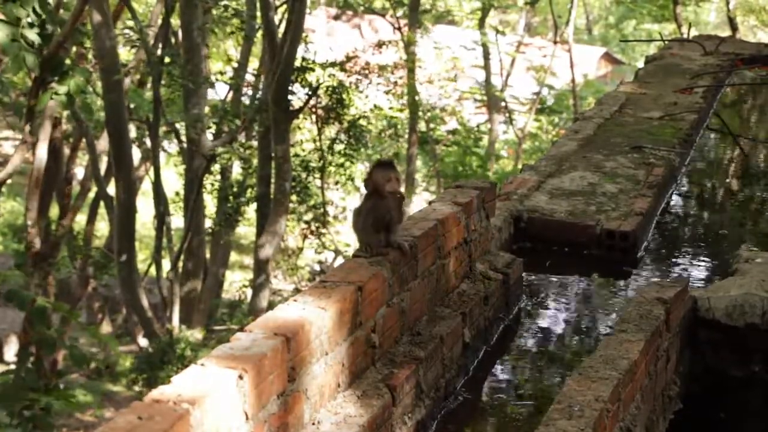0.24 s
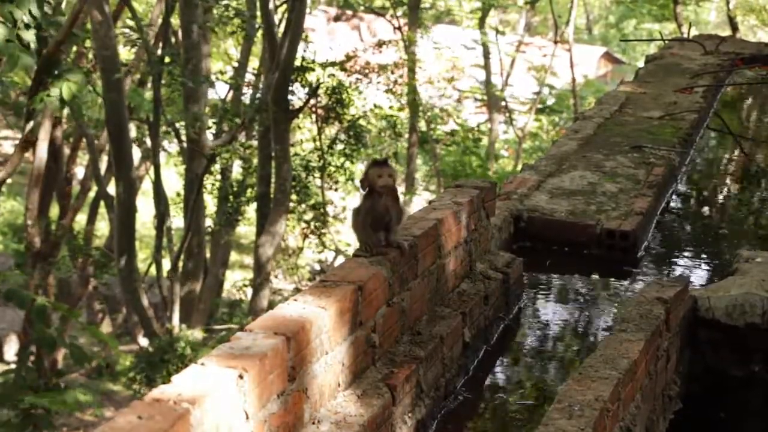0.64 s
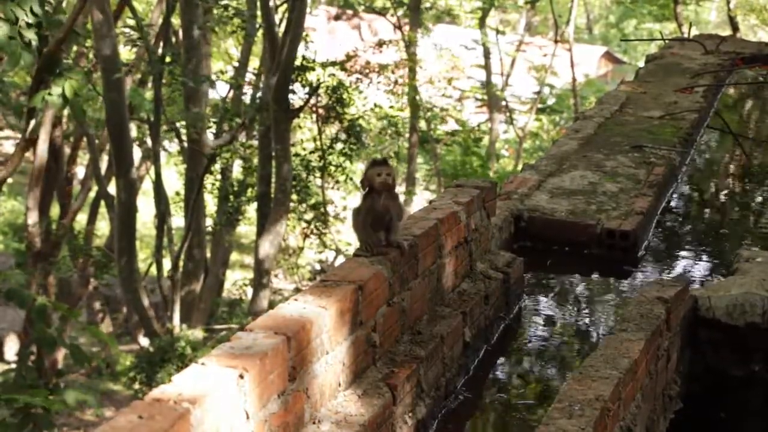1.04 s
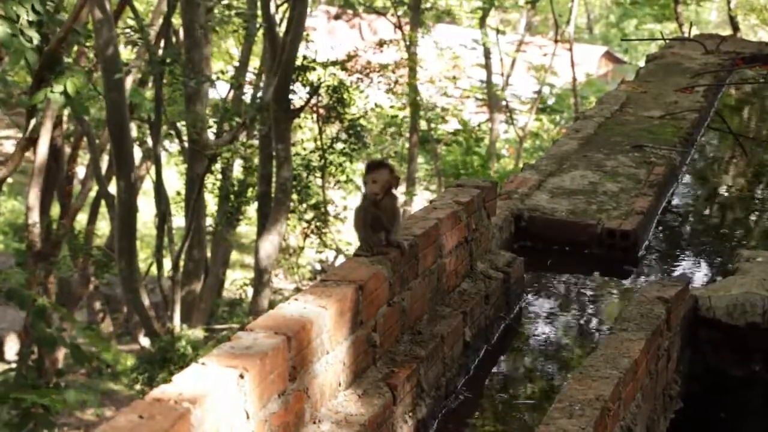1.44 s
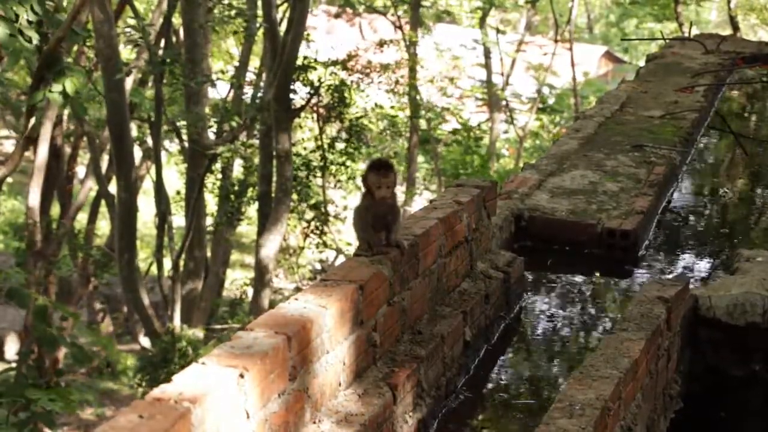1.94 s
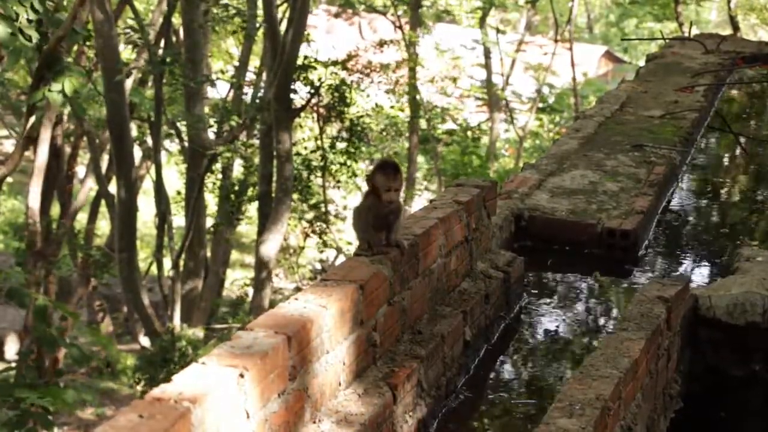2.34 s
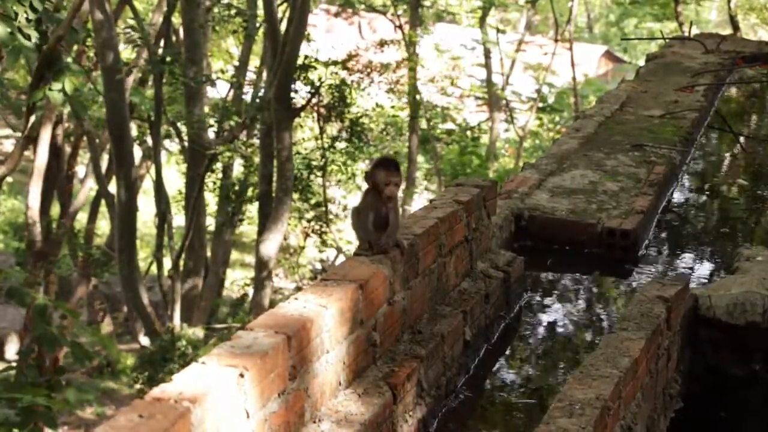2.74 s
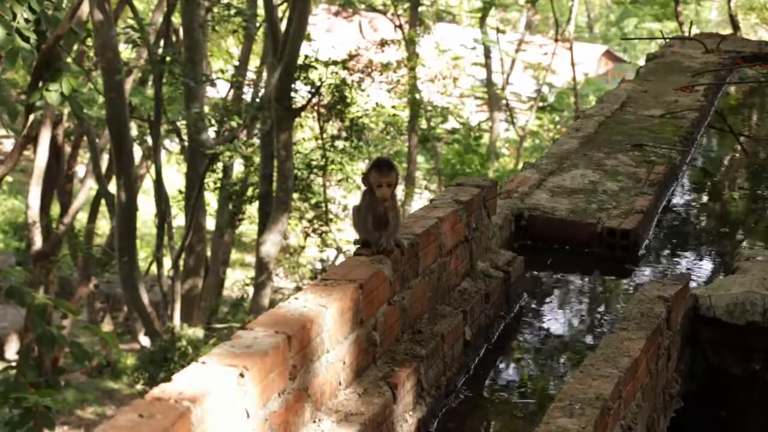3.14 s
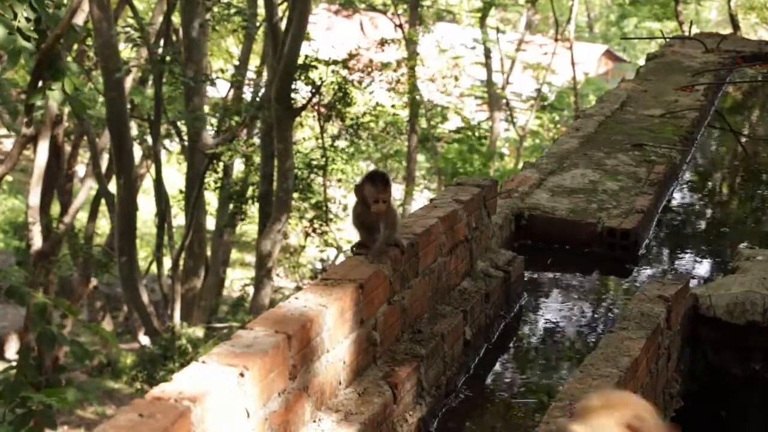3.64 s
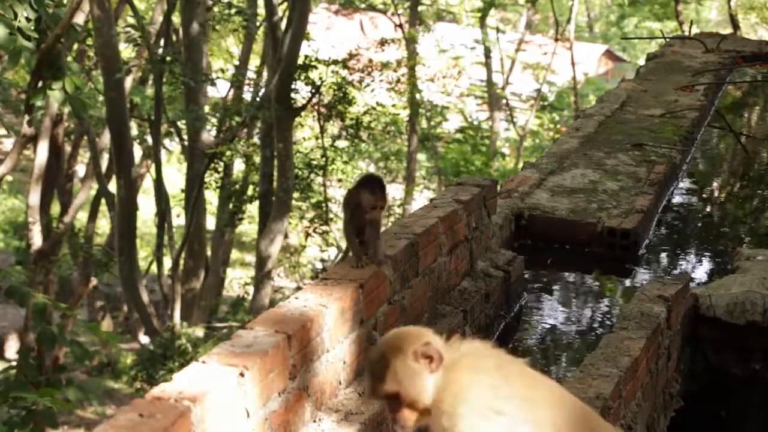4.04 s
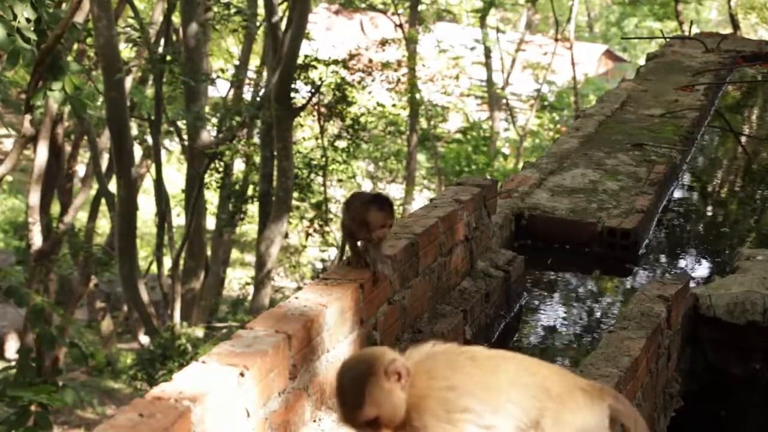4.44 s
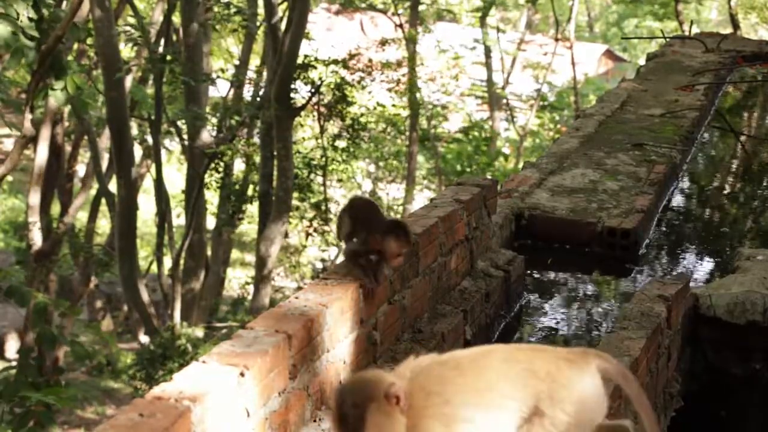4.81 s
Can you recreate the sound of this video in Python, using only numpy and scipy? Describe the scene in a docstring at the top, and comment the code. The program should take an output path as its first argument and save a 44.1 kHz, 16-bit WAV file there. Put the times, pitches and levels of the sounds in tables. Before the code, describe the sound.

Birds call over a soft forest hush while monkeys tap across brick, crackle dry leaves and tip over something hollow.

```python
"""Quiet woodland beside a brick water channel, with macaques moving about close to the microphone.
Over a soft hush of air and far insects, a bird whistles well back on the left, while the monkeys' feet
tap on brick and snap twigs on the right. A second bird joins with short runs of falling chips, and the
monkeys brush and crackle through dry litter. Near four seconds, between low bumps at the microphone,
something hard and hollow tips over and rattles to rest. A last run of chips and sharp snaps follow."""
import sys
import numpy as np
from scipy import signal
from scipy.fft import rfft, irfft
from scipy.io import wavfile
from scipy.ndimage import uniform_filter1d

SR = 44100
rng = np.random.default_rng(int(sys.argv[2]) if len(sys.argv) > 2 else 0)


def generate_wav(signal):
    """Clip the signal to [-1, 1] and save it as 16-bit WAV at the path in sys.argv[1]."""
    frames = np.transpose(np.atleast_2d(signal))
    scaled = np.clip(frames, -1, 1) * 32767
    pcm = np.round(scaled).astype(np.int16)
    wavfile.write(sys.argv[1], SR, pcm)


N = 223719
LAG = 7  # samples by which a sound on the right reaches the left microphone later


def amp(db):
    """Decibels to gain."""
    return 10 ** (np.asarray(db) / 20)


def unit(x):
    """Scales to rms 1."""
    return x / np.sqrt(np.mean(x ** 2) + 1e-20)


def read(points, hz):
    """Reads a table on a log-frequency axis."""
    f, value = np.transpose(points)
    return np.interp(np.log(hz + 1), np.log(f + 1), value)


def colour(x, points):
    """Filters a sound by a table of (frequency [Hz], gain [dB])."""
    n = x.shape[-1]
    return irfft(rfft(x) * amp(read(points, np.fft.rfftfreq(n, 1 / SR))), n)


def band(x, centre_hz, spread):
    """Keeps a bell of frequencies, spread in octaves, tilted slightly to the bass; rms 1."""
    n = x.shape[-1]
    hz = np.fft.rfftfreq(n, 1 / SR) + 1
    bell = np.exp(-.5 * (np.log2(hz / centre_hz) / spread) ** 2)
    return unit(irfft(rfft(x) * bell / hz ** (1 / 4), n))


def fade(t, t60):
    """Exponential decay, 60 dB down at t60."""
    return np.exp(-np.log(1000) * t / np.maximum(t60, 1e-3))


def add(mix, s, sound):
    """Mixes a sound in at s seconds."""
    part = mix[..., round(s * SR):][..., :sound.shape[-1]]
    part += sound[..., :part.shape[-1]]


def hush(level_db=-43.5, patchy_db=1.5, swell_db=0.2, lean_db=0.5):
    """Distant air and foliage all around: noise whose level drifts in patches of time and frequency."""
    # spectrum of the air: (frequency [Hz], relative level [dB])
    spectrum = [(15, -52), (25, -12.5), (97, -0.5), (170, -2.5), (263, -3), (439, -9.5), (560, -8.5),
                (1000, -12), (1370, -14), (2280, -14), (2910, -15), (4030, -17.5), (5570, -20),
                (14800, -32.5), (16000, -39)]
    # slow drift in the level of the upper hush, in full from 1 kHz up: (time [s], gain [dB])
    upper_drift = [(0, 2), (.7, 1.5), (1.3, 2), (2.1, 1.5), (2.55, 1), (3.6, 1), (4.3, -0.5), (5.05, 1)]
    # how alike the air is at the two microphones: (frequency [Hz], coherence [-1 to 1])
    likeness = [(60, 0.59), (120, 0.98), (240, 0.88), (480, 0.74), (950, 0.28), (1900, -0.2), (3800, -0.12),
                (7500, 0.064)]
    frames, hz = N // 256 + 5, np.fft.rfftfreq(1024, 1 / SR)
    left_re, left_im, other_re, other_im, patches = rng.standard_normal((frames, 513, 5)).T
    patches = unit(uniform_filter1d(uniform_filter1d(patches, size=12, axis=0), size=14, axis=1))
    swell = unit(uniform_filter1d(rng.standard_normal(frames), size=30))
    upper_share = np.minimum(hz / 1000, 1)[:, None]
    drift_db = upper_share * np.interp(np.arange(frames) * 256 / SR, *np.transpose(upper_drift))
    same = np.clip(read(likeness, hz), -1, 1)[:, None]
    left = left_re + 1j * left_im
    right = same * left + np.sqrt(1 - same ** 2) * (other_re + 1j * other_im)
    lean = read([(500, lean_db), (2000, -lean_db)], hz)[:, None]  # bass to the left, treble to the right
    db = read(spectrum, hz)[:, None] + drift_db + patchy_db * patches + swell_db * swell
    spectra = np.array([left * amp(db + lean), right * amp(db - lean)])
    air = signal.istft(spectra, nperseg=1024, noverlap=768)[1][:, :N]
    return amp(level_db) * unit(air)


def hum(level_db=-57, pitch_hz=100):
    """A faint far-off hum: a band of noise so narrow that it wavers."""
    return amp(level_db) * band(rng.standard_normal(N), pitch_hz, spread=0.018)


def insects(level_db=-60, pitch_hz=5550):
    """A far chorus of insects, merged into a thin steady hiss."""
    return amp(level_db) * band(rng.standard_normal((2, N)), pitch_hz, spread=0.16)


def tick(db, centre_hz, t60, ring_db=-2, rise_s=0.00018):
    """A snap or tap: a wide crack plus the narrow ring of the thing struck, both dying quickly."""
    t = np.arange(4096) / SR
    crack = band(rng.standard_normal((2, len(t))), centre_hz, spread=0.77)
    ring = band(rng.standard_normal((2, len(t))), centre_hz, spread=0.19)
    envelope = (1 - np.exp(-t / rise_s)) * fade(t, t60)
    return amp(db) * unit(crack + amp(ring_db) * ring) * envelope


def crumbs(length, pitch_hz, per_s=700, t60=0.029, scatter_octaves=0.541, scatter_db=3):
    """Crumbs of brick roll under a foot, each with a short ring of its own pitch."""
    t = np.arange(2048) / SR
    out = np.zeros((2, round(length * SR) + len(t)))
    for s in np.arange(0, length, 1 / per_s):
        size, strength, late, side = rng.standard_normal(4)
        phase = 2 * np.pi * pitch_hz * 2 ** (size * scatter_octaves) * t
        ring = np.sin([phase + side, phase]) * fade(t, t60)
        add(out, s + abs(late) / per_s, amp(strength * scatter_db) * ring)
    return out * np.sqrt(length * SR) / np.linalg.norm(out[1])


def grains(per_s, uneven_db):
    """One second of small clicks of unequal size."""
    sizes = amp(uneven_db * np.minimum(rng.exponential(1, SR), 4))
    struck = rng.random(SR) < per_s / SR
    return sizes * struck * rng.standard_normal((2, SR))


def stroke(length, db, centre_hz, spread, taper):
    """Grit and leaves give way grain by grain under a stroke; coarse grit is duller and sparser."""
    press = signal.windows.tukey(round(length * SR), taper)
    per_s = read([(1000, 1800), (2500, 5900)], centre_hz)
    grit = band(grains(per_s, uneven_db=2.0), centre_hz, spread)[:, :len(press)]
    return amp(db) * unit(grit) * press


def footfalls(crumb_db=-3.5, grit_db=-3, grit_octaves_up=0.97):
    """Feet land on the brick: a hollow tap with a scuff of coarse crumbs and fine grit."""
    # footfalls: (time [s], tap level [dB], pitch [Hz], scuff level [dB], scuff length [s])
    steps = [(0.013, -37, 1500, -35, 0.01), (0.412, -36, 1570, -39.5, 0.0062),
             (2.301, -29.5, 392, -40, 0.0071), (2.654, -38, 955, -44, 0.013),
             (2.751, -37.5, 810, -46.5, 0.026), (2.822, -27.5, 2100, -37, 0.011),
             (2.825, -29, 1040, -42, 0.017), (2.878, -32, 976.6, -37, 0.0089),
             (2.936, -33.5, 1100, -41.5, 0.01), (2.952, -37, 700, -46, .022),
             (2.994, -34.5, 1200, -43, 0.0134), (3.017, -32, 1100, -43.5, .016),
             (3.042, -37, 900, -47, .008), (3.069, -33.5, 1000, -41, 0.007), (3.081, -34, 1200, -46, .008),
             (3.091, -33, 690, -52, .008), (3.146, -39, 920, -49, .01), (3.161, -35, 1100, -41, 0.014),
             (3.187, -29.5, 1735, -36, 0.0098), (3.305, -32.5, 950, -43, 0.01),
             (3.322, -34, 1100, -42.5, .018), (3.346, -32, 1220, -49, 0.012),
             (3.826, -39, 1490, -36, 0.015), (3.856, -33.5, 635, -54, 0.0079),
             (4.581, -37.5, 1490, -43, 0.014)]
    out = np.zeros((2, N))
    for s, tap_db, pitch_hz, scuff_db, length in steps:
        grit_hz = pitch_hz * 2 ** grit_octaves_up
        add(out, s, tick(tap_db, pitch_hz, t60=0.052, ring_db=5, rise_s=0.0014))
        add(out, s, amp(scuff_db + crumb_db) * crumbs(length, pitch_hz))
        add(out, s, stroke(length, scuff_db + grit_db, grit_hz, spread=0.99, taper=0.11))
    return out


def from_right(pair):
    """Places a pair of signals close on the right: later, duller and partly unlike on the left."""
    # how alike a near sound is at the two microphones: (frequency [Hz], coherence [0 to 1])
    likeness = [(400, 0.99), (900, 0.95), (2000, 0.12), (10000, 0.15)]
    # shading at the left microphone: (frequency [Hz], gain [dB])
    shade = [(400, -1.5), (1000, 0), (2000, -1.5), (4000, -7), (10000, -3)]
    hz = np.fft.rfftfreq(N, 1 / SR)
    scatter, direct = rfft(pair)
    same = np.clip(read(likeness, hz), 0, 1)
    delayed = direct * np.exp(-2j * np.pi * hz * LAG / SR)
    left = same * delayed + np.sqrt(1 - same ** 2) * scatter
    return np.array([irfft(left * amp(read(shade, hz)), N), pair[1]])


def hollow():
    """The ring of a hard hollow body after one sharp blow: a sum of decaying modes."""
    # modes of the body: (frequency [Hz], relative level [dB], t60 [s])
    modes = [(300, -22, 0.17), (377.6, -9.5, 0.029), (585, -9, 0.05), (640, -6.5, 0.19), (840, -7.5, 0.1),
             (927, -8, 0.056), (1064, -3, 0.08), (1240, -17, 0.074), (1405, -16, 0.08), (1680, -18, 0.18),
             (2097, -16, 0.13), (2530, -19, 0.14), (2925, -21, 0.15), (3060, -8, 0.046)]
    t = np.arange(16384) / SR
    return sum(amp(db) * np.sin(2 * np.pi * hz * t) * fade(t, t60) for hz, db, t60 in modes)


def whistle(times, hz, db, rasp, flutter_db=2.5, flutter_hz=24.6):
    """A bird's tone follows a pitch curve, rasps with a fast quaver and wavers through the trees."""
    t = np.arange(times[0], times[-1], 1 / SR)
    quaver = band(rng.standard_normal(SR), centre_hz=135, spread=0.89)[:len(t)]
    flutter = amp(flutter_db * band(rng.standard_normal(SR), flutter_hz, spread=0.57)[:len(t)])
    cycles = np.cumsum(np.interp(t, times, hz) * (1 + rasp * quaver)) / SR
    edges = np.clip(np.minimum(t - times[0], times[-1] - t) / 0.002, 0, 1)
    return amp(np.interp(t, times, db)) * edges * unit(flutter * np.sin(2 * np.pi * cycles))


def note(length, db, from_hz, to_hz, rasp, rise_share=0.31, fall_share=0.14, edge_db=-2):
    """A note swells, holds and fades while its pitch stays level or slides evenly."""
    progress = np.linspace(0, 1, 40)
    edge = np.interp(progress, [0, rise_share, 1 - fall_share, 1], [1, 0, 0, 1])
    return whistle(length * progress, from_hz + (to_hz - from_hz) * progress, db + edge_db * edge, rasp)


def swelling_note(length=0.135, db=-41, pitch_hz=2520, rise_share=0.76, edge_db=-12):
    """A nearly pure whistle on one pitch swells slowly and fades more quickly."""
    times = length * np.array([0, rise_share, 1])
    return whistle(times, np.full(3, pitch_hz), [db + edge_db, db, db + edge_db], rasp=0.008)


def warble(length=0.185, db=-36.5, pitch_hz=1830, swing_hz=205, swings_per_s=14):
    """The pitch swings evenly, and the voice is strongest at the turns, the high ones most."""
    t = np.arange(0, length, 1 / SR)
    swing = -np.cos(2 * np.pi * swings_per_s * t)
    turn_db = swing - 3 * (1 - swing ** 2)
    growth_db = 1.5 * (t / length - .5)
    return whistle(t, pitch_hz + swing_hz * swing, db + turn_db + growth_db, rasp=0.042)


def whistling_bird():
    """A bird on the left sings held notes and falling or rising slurs, with one warble among them."""
    # the song: (start [s], length [s], relative level [dB], from [Hz], to [Hz], rasp [share of pitch])
    notes = [(0.042, 0.056, -43.5, 2863, 2917, 0.013), (0.111, 0.17, -49.5, 2854, 2734, 0.028),
             (0.282, 0.065, -40.5, 3150, 2390, 0.053), (.733, 0.02, -46.5, 2530, 2490, 0.037),
             (0.79, 0.026, -43, 2430, 2520, 0.025), (0.824, .035, -47, 2456, 2416, .02),
             (.812, .025, -43.5, 2290, 1980, 0.043), (.845, 0.037, -37.5, 1773, 1794, .012),
             (1.022, 0.022, -34, 2110, 2110, 0.013), (1.057, 0.056, -48, 2110, 2103, 0.023),
             (1.034, 0.075, -48.5, 3830, 3980, 0.022), (1.068, 0.075, -43.5, 2520, 2630, 0.055),
             (1.124, 0.044, -38, 2750, 2960, 0.056), (1.153, 0.052, -35, 2860, 2955, 0.036),
             (1.21, .06, -42, 2940, 2880, .025), (1.271, 0.078, -40.5, 2876, 2795, 0.036),
             (1.327, .055, -41.5, 2740, 1786, 0.034), (1.442, 0.019, -37.5, 1697, 1394, 0.062),
             (1.461, 0.026, -32, 1448, 1690, .008), (1.49, 0.044, -34, 1765, 2092, .028),
             (1.541, 0.077, -39.5, 2079, 2057, 0.015), (1.616, 0.07, -40.5, 2970, 2300, 0.038),
             (1.949, 0.046, -39.5, 2810, 2390, 0.06), (2.052, 0.063, -50, 2936, 2410, 0.085)]
    song = np.zeros(N)
    for start, *shape in notes:
        add(song, start, note(*shape))
    add(song, 0.575, swelling_note())
    add(song, 0.849, warble())
    return np.array([song, amp(-3) * np.roll(song, 2)])  # softer and later on the right


def foliage(x, t60=0.14):
    """Leaves and trunks on the way scatter a call into a cluster of near arrivals."""
    t = np.arange(4096) / SR
    taps = rng.standard_normal((2, len(t))) * fade(t, t60)
    taps /= np.linalg.norm(taps, axis=1, keepdims=True)
    return signal.oaconvolve(x, taps, axes=1)[:, :N]


def trees(x, echoes_per_s=2500):
    """Sparse echoes from trunks; the bass lingers longest and the band near 1 kHz dies first."""
    # decay of the woodland: (frequency [Hz], t60 [s])
    decay = [(200, 0.98), (1000, 0.23), (2500, 0.78), (6000, 0.62), (14000, 0.5)]
    taps = rng.standard_normal((2, SR)) * (rng.random((2, SR)) < echoes_per_s / SR)
    taps[:, :SR // 125] = 0  # the first echo takes 8 ms
    hz, t, spectra = signal.stft(taps, SR, nperseg=256)
    tail = signal.istft(spectra * fade(t, read(decay, hz)[:, None]), SR, nperseg=256)[1]
    tail /= np.linalg.norm(tail, axis=1, keepdims=True)
    return signal.fftconvolve(x, tail, axes=1)[:, :N]


def twig_snaps(gain_db=0.55):
    """Twigs and dry leaves snap one by one."""
    # snaps: (time [s], relative level [dB], centre [Hz], t60 [s])
    snaps = [(.093, -28.5, 3240, 0.025), (0.5506, -27.5, 4970, 0.011), (.809, -39, 8260, .03),
             (1.166, -29, 4730, 0.012), (1.387, -40, 9450, 0.09), (1.9175, -38, 5830, 0.015),
             (1.9872, -31.5, 6100, 0.02), (2.099, -36, 9600, 0.03), (2.109, -33, 9600, .045),
             (2.135, -28.5, 5100, 0.013), (2.160, -33.5, 7900, 0.04), (2.213, -36, 7000, .04),
             (2.2362, -29, 6070, 0.024), (2.251, -37, 2417, 0.035), (2.638, -27, 4900, 0.011),
             (2.698, -37.5, 3890, 0.085), (2.725, -23, 7480, 0.02), (2.777, -33.5, 5870, 0.12),
             (2.8803, -23, 7000, 0.015), (2.898, -25, 2250, 0.019), (2.912, -28.5, 4070, 0.021),
             (2.925, -31, 4280, 0.014), (2.941, -31, 3800, .016), (3.085, -34, 3504, 0.014),
             (3.163, -35.5, 4500, .02), (3.191, -39, 3873, .02), (3.673, -30, 7750, 0.025),
             (3.829, -31.5, 4000, 0.038), (3.856, -29, 3860, 0.026), (4.468, -29, 3140, 0.015),
             (4.6635, -22, 2860, 0.025), (4.759, -21, 2930, 0.031), (4.761, -10, 2680, 0.009),
             (4.854, -38, 7000, .02), (4.9202, -15.5, 3900, 0.013), (4.956, -26, 3800, 0.016),
             (5.028, -31, 3920, 0.017)]
    out = np.zeros((2, N))
    for s, db, centre_hz, t60 in snaps:
        add(out, s, tick(db + gain_db, centre_hz, t60))
    return out


def far_wall(x, delay_s=0.11, centre_hz=1200, t60=0.88):
    """A dull smeared echo comes back from some way off."""
    t = np.arange(SR // 2) / SR
    taps = band(rng.standard_normal((2, len(t))), centre_hz, spread=0.58) * fade(t, t60)
    out = np.zeros((2, N))
    add(out, delay_s, signal.fftconvolve(x, taps / np.linalg.norm(taps[0]), axes=1))
    return out


def chipping_bird(length=0.036, fall_hz=450):
    """A bird straight ahead calls in short runs, every chip the same quick fall in pitch."""
    # chips: (start [s], relative level [dB], starting pitch [Hz])
    chips = [(1.409, -45, 3225), (1.496, -46, 3140), (2.307, -48, 3180), (2.372, -47.5, 3160),
             (2.441, -48.5, 3220), (3.3, -52, 3182), (3.37, -52.5, 3220), (3.437, -46.5, 3230),
             (3.503, -46, 3280), (4.44, -59, 3166), (4.473, -54, 3250), (4.507, -56, 3160),
             (4.54, -49.5, 3340), (4.574, -48, 3210), (4.608, -48, 3285), (4.645, -45, 3340),
             (4.682, -44, 3500), (4.714, -49, 3390)]
    calls = np.zeros(N)
    for s, db, from_hz in chips:
        add(calls, s, note(length, db, from_hz, from_hz - fall_hz, rasp=0.028))
    return np.array([calls, calls])


def litter_rustles():
    """Bodies brush and crunch through the dry litter."""
    # brushes: (start [s], end [s], level [dB], centre [Hz], spread [octaves])
    rustles = [(1.887, 1.901, -35.5, 3740, 1.06), (1.891, 2.004, -40.5, 1580, 1.5),
               (1.927, 1.938, -31.5, 6300, 0.71), (1.94, 1.952, -28, 3300, 0.95),
               (2.037, 2.308, -50.5, 3270, 1.2), (2.741, 3.09, -48, 900, 2.15),
               (2.9, 2.978, -43.5, 4050, 0.11), (3.298, 3.43, -49, 550, 1.06),
               (3.481, 3.923, -48.5, 651, 2.3), (3.565, 3.693, -46.5, 3700, 0.89),
               (3.881, 4.031, -37.5, 1820, 1.09), (4.641, 4.779, -37, 2540, 1.08),
               (4.754, 4.9, -42.5, 2100, 1.16)]
    out = np.zeros((2, N))
    for start, end, db, centre_hz, spread in rustles:
        add(out, start, stroke(end - start, db, centre_hz, spread, taper=0.28))
    return out


def leaf_crackles(per_s=45, centre_hz=5760, scatter_db=1.5, scatter_octaves=0.57):
    """Dry leaves crackle in loose spells, each tick differing in timing, strength and pitch."""
    # spells of crackling: (start [s], end [s], level [dB])
    spells = [(2.111, 2.26, -41), (2.463, 2.5, -35), (2.757, 2.95, -38.5)]
    out = np.zeros((2, N))
    for start, end, db in spells:
        for slot in np.arange(start, end, 1 / per_s):
            late, strength, smallness = rng.uniform(-1, 1, 3)
            hz = centre_hz * 2 ** (smallness * scatter_octaves)
            add(out, slot + .5 * late / per_s, tick(db + strength * scatter_db, hz, t60=0.034))
    return out


def bumps(right_db=-15, shudder_db=-22, shudder_hz=65, shudder_s=0.064):
    """Single swings of pressure, mostly at the left microphone, each inside a brief low shudder."""
    # low bumps: (time [s], peak level [dB], pitch [Hz])
    swings = [(3.735, -27.5, 94.9), (4.239, -25, 121.3), (4.251, -28, 48), (4.254, -16.5, 136),
              (4.2811, -23, 83)]
    out, t = np.zeros(N), np.arange(-4096, 4096) / SR
    envelope = np.exp(-.5 * (t / shudder_s) ** 2)
    for s, db, hz in swings:
        phase = 2 * np.pi * hz * t
        swing = phase * np.exp((1 - phase ** 2) / 2)
        shudder = band(rng.standard_normal(len(t)), shudder_hz, spread=1.46) * envelope
        add(out, s + t[0], amp(db) * (swing + amp(shudder_db) * shudder))
    return np.array([out, amp(right_db) * out])


def knock(bite_s=0.00035, push_hz=805, push_db=-7.5, click_db=-1, crack_db=-4, ring_db=-5, grit_db=-30):
    """The hollow body tips over close on the right: each contact clicks, cracks and rings."""
    # it lands edge first, then flat, and rattles: (time [s], edge level [dB], body level [dB])
    contacts = [(3.9296, -3.5, -18), (3.9353, -23, -8.5), (3.9401, -32, -26), (3.9517, -21, -27),
                (3.9575, -28, -28), (3.966, -26, -27), (3.9705, -29, -34), (3.997, -36, -33),
                (4.008, -37, -34)]
    # spectrum of a crack: (frequency [Hz], relative level [dB])
    crack_spectrum = [(150, -45), (240, -14), (350, -2), (470, -16), (600, 2), (850, 6), (1300, 5.5),
                      (2000, 1), (4000, 3), (7000, -7.5), (10000, -8), (12000, -11), (16000, -24)]
    cracks, body, ring = np.zeros((2, N)), np.zeros(N), hollow()
    t = np.arange(len(ring)) / SR
    bite = 1 - np.exp(-t / bite_s)
    push = amp(push_db) * np.sin(2 * np.pi * push_hz * t) * (t < 1 / push_hz)  # one swing of pressure
    for s, edge_db, body_db in contacts:
        click = band(rng.standard_normal((2, len(t))), centre_hz=4000, spread=1.0) * fade(t, t60=0.0085)
        crack = unit(colour(rng.standard_normal((2, len(t))), crack_spectrum)) * fade(t, t60=0.047)
        add(cracks, s, amp(edge_db) * (amp(click_db) * click + amp(crack_db) * crack * bite))
        add(body, s, amp(body_db) * (amp(ring_db) * ring * bite + push))
    flat_s = contacts[1][0]  # once flat, it grinds to rest
    grind = band(grains(per_s=5200, uneven_db=2.5), centre_hz=1400, spread=1.6)[:, :len(t)]
    add(cracks, flat_s, amp(grit_db) * grind * fade(t, t60=0.39))
    pair = from_right(cracks) + np.array([amp(-1) * np.roll(body, LAG), body])
    # the knock carries no deep bass and none of the highest treble
    radiation = signal.butter(2, [242, 10600], "bandpass", fs=SR, output="sos")
    return signal.sosfilt(radiation, pair)


def distant_birds(direct_db=-3, scatter_db=-6, song_echo_db=-5.5, chip_echo_db=-5):
    """Both birds are well back in the wood, heard directly, through leaves and off the trunks."""
    song, chips = whistling_bird(), chipping_bird()
    direct = amp(direct_db) * (song + chips)
    scattered = amp(scatter_db) * foliage(direct)
    return direct + scattered + trees(amp(song_echo_db) * song + amp(chip_echo_db) * chips)


def scene(hollow_db=-22, monkey_echo_db=-15, knock_echo_db=-26.5, wall_db=-30):
    """Close monkeys stir the hollow body; they and the knock echo faintly, over birds and hush."""
    monkeys = from_right(twig_snaps() + leaf_crackles() + footfalls() + litter_rustles())
    hit, ring = knock(), hollow()
    stirred = signal.oaconvolve(monkeys, ring[None] / np.linalg.norm(ring), axes=1)[:, :N]
    monkeys += amp(hollow_db) * stirred
    echoes = trees(amp(monkey_echo_db) * monkeys + amp(knock_echo_db) * hit)
    echoes += amp(wall_db) * far_wall(monkeys + hit)
    return hush() + hum() + insects() + distant_birds() + bumps() + monkeys + hit + echoes


def record(dry):
    """The recorder rounds off the highest peaks, then cuts the treble above 16.2 kHz."""
    lowpass = signal.firwin(511, 16200, window=("kaiser", 9), fs=SR)
    return signal.oaconvolve(np.tanh(dry), lowpass[None], "same")


dry = scene()
out = record(dry)
generate_wav(out)
```